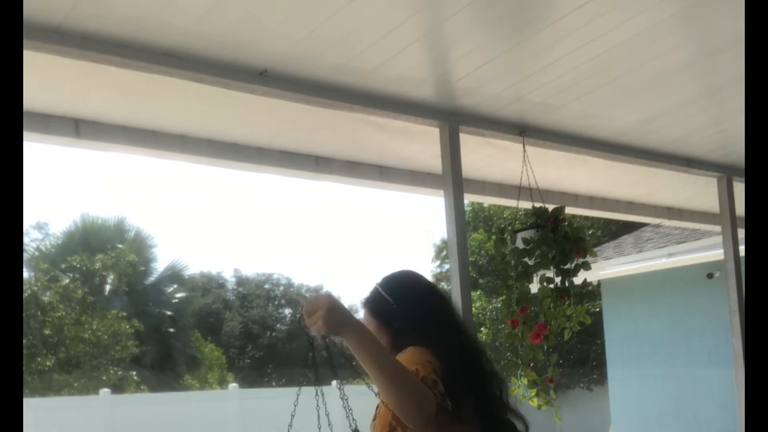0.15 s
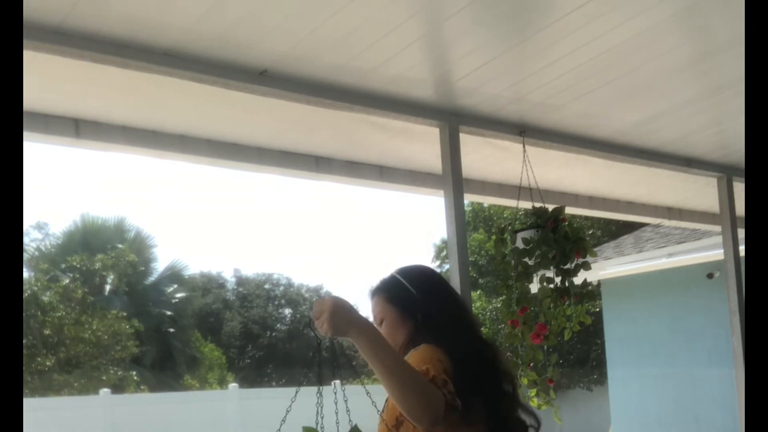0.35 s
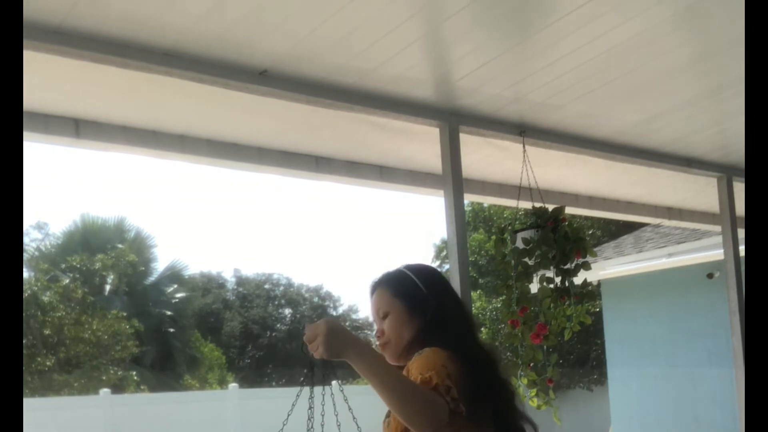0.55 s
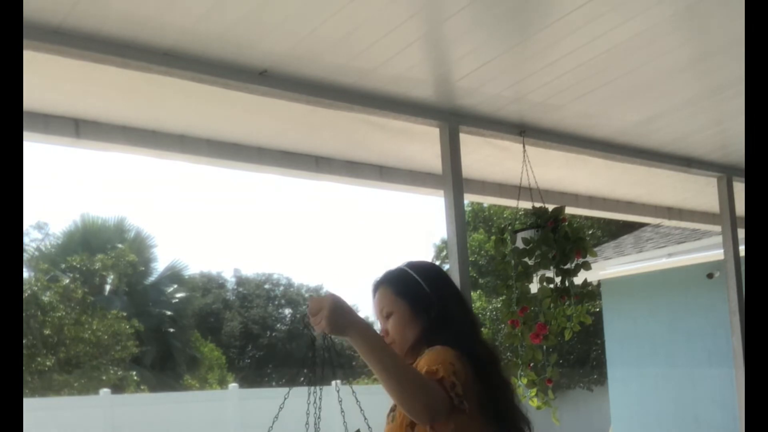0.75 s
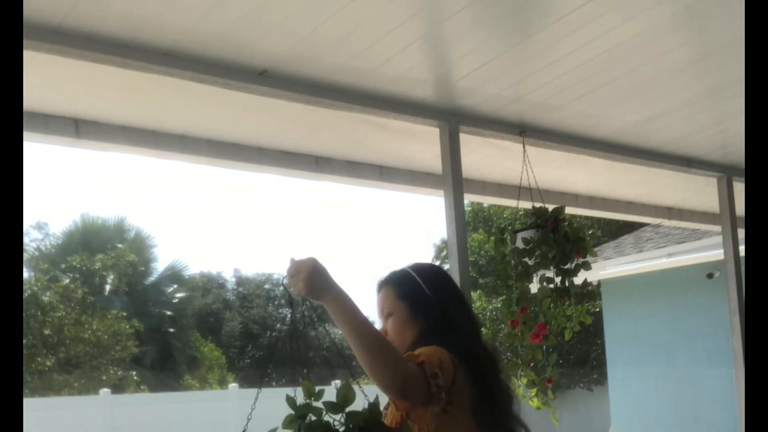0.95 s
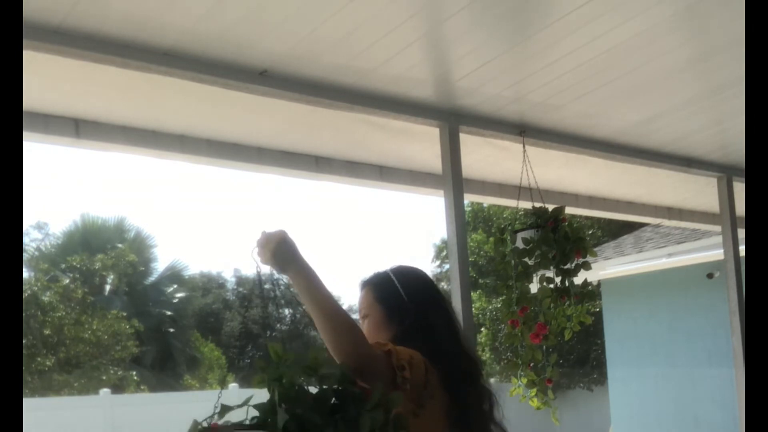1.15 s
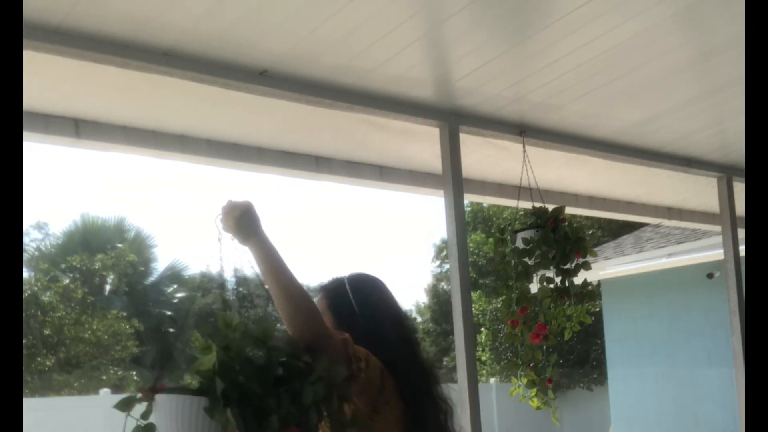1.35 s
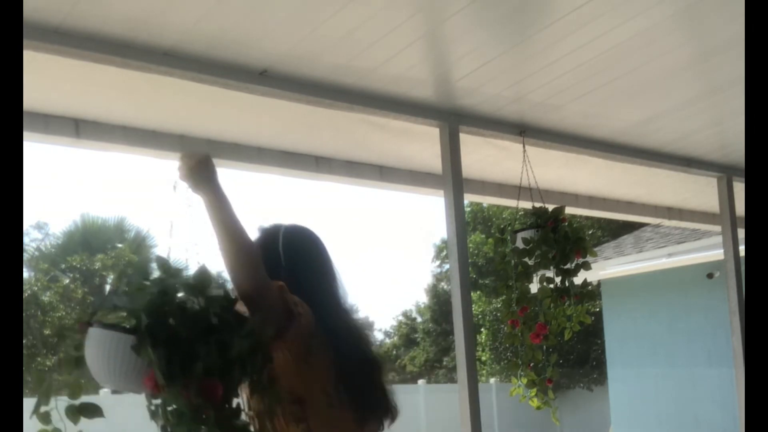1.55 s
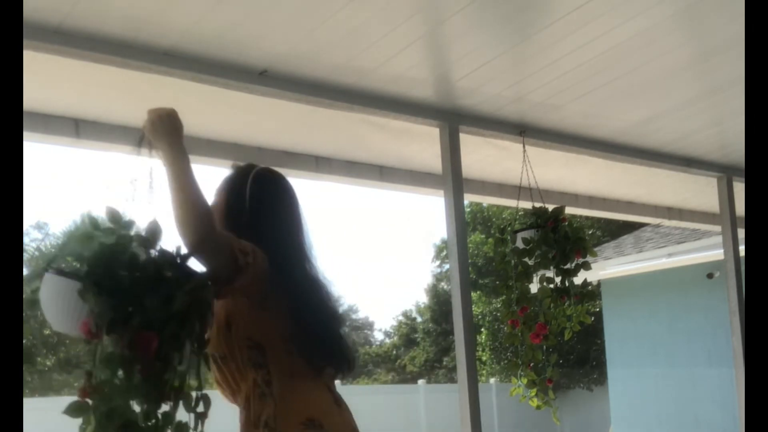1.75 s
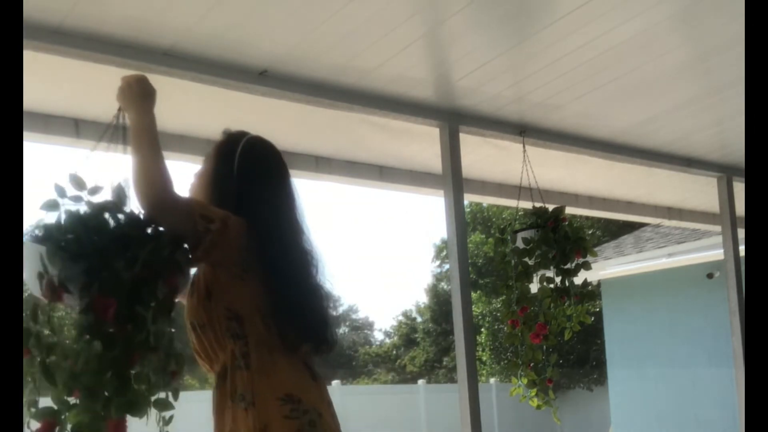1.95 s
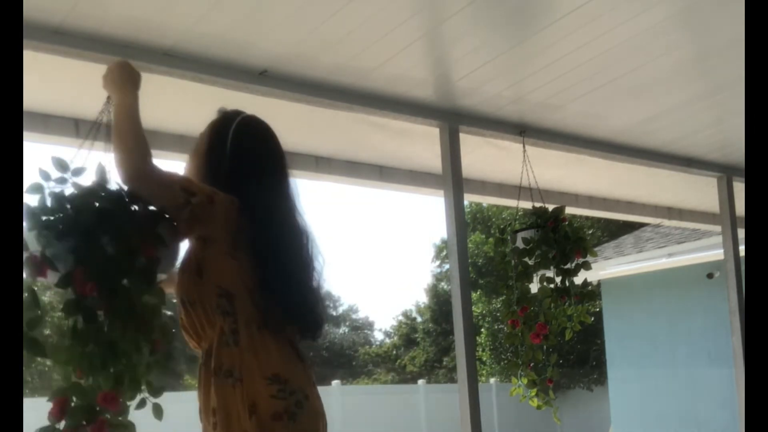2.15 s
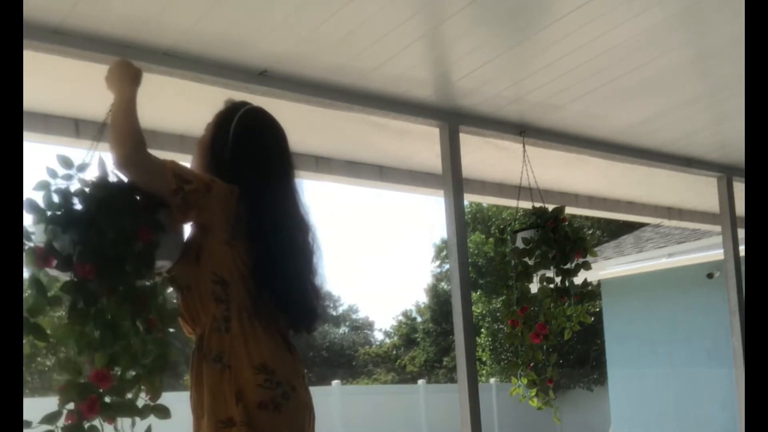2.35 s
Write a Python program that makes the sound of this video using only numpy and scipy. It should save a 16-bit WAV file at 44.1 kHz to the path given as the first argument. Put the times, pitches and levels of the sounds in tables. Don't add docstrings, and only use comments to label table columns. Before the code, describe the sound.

Hollow, woody knocks from a plant pot being lifted: a light touch, a loud tumbling thud, then weaker bounces. Low dragging runs beneath, with distant rumble and a faint early whine, on an echoing outdoor porch.

```python
import sys
import numpy as np
from scipy import signal
from scipy.fft import rfft, irfft
from scipy.io import wavfile

SR = 44100
rng = np.random.default_rng(int(sys.argv[2]) if len(sys.argv) > 2 else 0)


def pcm_store(signal):
    levels = np.round(np.clip(np.atleast_2d(signal), -1, 1) * 32767)
    wavfile.write(sys.argv[1], SR, levels.astype(np.int16).T)


def makeup_ratio(level_db):
    decades = np.asarray(level_db, float) / 20
    return 10 ** decades


N = 110250


def unit(x):
    return x / np.sqrt(np.mean(x ** 2) + 1e-20)


def in_time(rows):
    s, *columns = np.transpose(rows)
    return [np.interp(np.arange(N) / SR, s, c) for c in columns]


def at_hz(points, hz):
    table_hz, values = np.transpose(points)
    return np.interp(np.log(hz), np.log(table_hz), values)


def drift(rate_hz):
    r = np.exp(-80 * np.pi * rate_hz / SR)
    white = rng.standard_normal(N // 40 + 2002)
    slow = signal.lfilter([1], [1, -2 * r, r * r], white)[2000:]
    return np.interp(np.arange(N) / 40, np.arange(len(slow)), unit(slow))


def colour(x, spectrum):
    hz = np.linspace(1, SR / 2, 4097)
    octaves_below = np.maximum(np.log2(spectrum[0][0] / hz), 0)
    octaves_above = np.maximum(np.log2(hz / spectrum[-1][0]), 0)
    db = at_hz(spectrum, hz) - 18 * octaves_below - 18 * octaves_above
    cepstrum = irfft(db * np.log(10) / 20)
    cepstrum[1:4096] *= 2
    cepstrum[4097:] = 0
    return signal.fftconvolve(x, irfft(np.exp(rfft(cepstrum))))[:len(x)]


def bands():
    edges = 22 * 2 ** np.arange(0, 9.7, .5)
    white = rng.standard_normal((2, N))
    out = []
    for k, (low, high) in enumerate(zip(edges, edges[1:])):
        sos = signal.butter(2, [low, high], "band", fs=SR, output="sos")
        out.append((np.sqrt(low * high), signal.sosfilt(sos, white[k % 2])))
    return out


def knocks():
    # start_s, level_db, contact_ms, crack_db (re blow), low_modes_db
    contacts = [(1.099, -22.5, 1.34, -42, -7.5), (1.116, -13, 0.68, -26, 6.5), (1.455, -4, 2.83, -41, 8),
                (1.49, -22.5, 1.4, -12, -4), (1.495, -2, 3.2, -31.5, -2.5), (1.512, -4, 1.5, -8.5, -19),
                (1.519, 4.5, 1.23, -15.5, 10), (1.531, 0.5, 1.85, -16.5, 5), (1.546, 3.5, 2.1, -18, -34),
                (1.553, 6.5, 1.48, -15, 6), (1.582, 5.5, 2.04, -24.5, -26), (1.905, -15.5, 3.6, -40, 4.5),
                (2.178, -12.5, 0.62, -45, -1.5), (2.197, -19.5, 3.2, -1, -10), (2.198, -1, 0.56, -37, 4.5),
                (2.206, -1, 0.99, -26.5, 4.5), (2.217, -13.5, 1.63, -13.5, 18.5)]
    # pitch_hz, level_db, t60_s
    modes = [(184.6, -4, 0.088), (225.3, -21.5, 0.25), (275.7, -3, 0.058), (315.5, -9, .14),
             (348, -6, 0.097), (541.5, -4, 0.046), (617.3, 2.5, 0.036), (712, -1.5, 0.045),
             (753, -0.5, 0.021), (840, -12.5, 0.037), (948, -9.5, 0.036), (1177, -10, 0.031),
             (1510, -22.5, 0.061), (2400, -26, .04)]
    # pitch_hz, level_db (per Hz)
    crack_colour = [(800, -0.5), (1300, -10.5), (2000, -14.5), (2500, -16), (3200, -19.5), (5000, -29),
                    (8000, -45), (14000, -66)]
    body_gain_db, strike_spread_db, body_rise_s = -5.5, 4.5, .002
    crack_gain_db, crack_rise_s, crack_decay_s = 5, 0.0013, .005
    porch_db, body_low_hz = -3.0, 152.4

    strengths = rng.standard_normal((len(contacts), len(modes)))
    t = np.arange(SR // 4) / SR
    grit = rng.standard_normal((len(contacts), SR // 20))
    u = t[:SR // 20]
    crack_shape = np.exp(-u / crack_decay_s) * (1 - np.exp(-u / crack_rise_s))
    out, walls = np.zeros(N + 2 * SR), bands()
    for k, (start_s, level_db, contact_ms, crack_db, low_db) in enumerate(contacts):
        ring = 0
        for m, (hz, mode_db, t60_s) in enumerate(modes):
            strike_db = mode_db + strike_spread_db * strengths[k][m] + low_db * (m < 2)
            ring = ring + (-1) ** m * makeup_ratio(strike_db - 60 * t / t60_s) * np.sin(2 * np.pi * hz * t)
        ring = ring * (1 - np.exp(-t / body_rise_s))
        push = np.sin(np.pi * np.clip(t[:400] * 1000 / max(contact_ms, .1), 0, 1)) ** 2
        hit = makeup_ratio(level_db + body_gain_db) * signal.fftconvolve(ring, push / push.sum())[:len(t)]
        crack = unit(colour(grit[k], crack_colour)) * crack_shape
        hit[:len(u)] += makeup_ratio(level_db + crack_db + crack_gain_db) * crack
        wet = makeup_ratio(porch_db) * signal.fftconvolve(hit, porch(walls, k * 4000))
        i = int(start_s * SR)
        out[i:i + len(hit)] += hit
        out[i:i + len(wet)] += wet
    return signal.sosfilt(signal.butter(6, body_low_hz, "high", fs=SR, output="sos"), out[:N])


def porch(walls, start):
    # pitch_hz, t60_s
    decay = [(100, 0.23), (300, 0.53), (700, 0.46), (2000, 0.63), (5000, 0.64), (12000, 0.4)]
    build_s, early_db, early_s = 0.004, 1.5, 0.029
    t = np.arange(SR * 3 // 4) / SR
    tail = sum(makeup_ratio(-60 * t / at_hz(decay, hz)) * band[start:start + len(t)] for hz, band in walls)
    tail = tail * (1 - np.exp(-t / build_s)) * (1 + makeup_ratio(early_db) * np.exp(-t / early_s))
    return tail / np.sqrt(np.sum(tail ** 2))


def drag():
    # time_s, level_db
    effort = [(0, -48), (.5, -55.5), (.53, -35.5), (.62, -42), (.72, -39.5), (.9, -42), (1.0, -38),
              (1.1, -33.5), (1.25, -34), (1.38, -42.5), (1.44, -28), (1.8, -34), (1.92, -35), (2.0, -39.5),
              (2.1, -41.5), (2.17, -41), (2.4, -38.5), (2.5, -46.5)]
    # pitch_hz, level_db (per Hz)
    drag_colour = [(18, -62), (30, -13.5), (65, 3.5), (270, -1), (340, -4.5), (420, -4.5), (926, -19),
                   (1040, -30.5), (3000, -37), (3900, -72), (6600, -120)]
    slips_per_s, size_spread_db = 2200, 0.68
    sizes = makeup_ratio(size_spread_db * np.minimum(rng.exponential(1, N), 4)) * rng.choice([-1, 1], N)
    clumps = makeup_ratio(1.57 * drift(11))
    slips = sizes * (rng.random(N) < slips_per_s / SR) * clumps
    return makeup_ratio(in_time(effort)[0]) * unit(colour(slips, drag_colour))


def whine():
    # time_s, pitch_hz, level_db, octave_db (re tone)
    path = [
        (0, 960, -77, 0),
        (.1, 980, -64, -4),
        (.3, 1002, -65.5, -2),
        (.47, 990, -67, -1),
        (.53, 960, -54, -17),
        (.6, 920, -53.5, -13),
        (.7, 905, -64, -18),
        (.78, 895, -87, -16),
    ]
    waver_db, waver_hz = 4.5, 9.0
    hz, db, octave_db = in_time(path)
    phase = 2 * np.pi * np.cumsum(hz + waver_hz * drift(24.5)) / SR
    tone = makeup_ratio(db + waver_db * drift(59)) * np.sin(phase)
    octave = makeup_ratio(db + octave_db + waver_db * drift(23)) * np.sin(2 * phase)
    sounding = np.arange(N) < path[-1][0] * SR
    return sounding * np.sqrt(2) * (tone + octave)


def insects():
    # pitch_hz, width_hz, level_db, start_s, end_s
    songs = [(4200, 80, -70, 1.99, 2.18), (4520, 160, -69, 1.97, 2.3), (4900, 70, -68, 1.98, 2.7),
             (4700, 400, -74, 1.3, 2.0), (8950, 300, -75, .55, 1.9), (8600, 200, -73, 2.25, 2.7),
             (9150, 450, -71, 1.99, 2.22), (9300, 350, -70, 2.2, 2.7), (9750, 120, -72, 2.33, 2.7)]
    swell_s = .07
    out, t = 0, np.arange(N) / SR
    for hz, width_hz, db, start_s, end_s in songs:
        r = np.exp(-np.pi * width_hz / SR)
        resonance = [1, -2 * r * np.cos(2 * np.pi * hz / SR), r * r]
        song = signal.lfilter([1, 0, -1], resonance, rng.standard_normal(N))
        swell = np.clip(np.minimum(t - start_s, end_s - t) / swell_s, 0, 1)
        out = out + makeup_ratio(db + 1.6 * drift(8.1)) * unit(song) * swell
    return out


def air():
    # pitch_hz, level_db (per Hz)
    outdoor = [(15, -52), (25, -15), (64, -3), (270, -5.5), (439, -21.5), (1020, -23), (1260, -28),
               (2000, -29.5), (16000, -45)]
    # time_s, level_db
    hiss_level = [(0, -89), (.5, -92), (.53, -72), (1.4, -69), (2.5, -61.5)]
    rumble_db, hiss_low_hz = -43, 7000
    rumble = 0
    for hz, band in bands():
        patchy_db = np.clip(600 / hz, .5, 2) * drift(8)
        rumble = rumble + makeup_ratio(at_hz(outdoor, hz) + patchy_db) * band
    high_pass = signal.butter(2, hiss_low_hz, "high", fs=SR, output="sos")
    hiss = signal.sosfilt(high_pass, rng.standard_normal(N))
    return makeup_ratio(rumble_db) * unit(rumble) + makeup_ratio(in_time(hiss_level)[0]) * hiss


def scene():
    return (knocks() + drag() + air() + whine() + insects())[None]


def low_pass(x):
    return signal.sosfilt(signal.butter(12, 16410, fs=SR, output="sos"), x)


def record(dry):
    top_cut = signal.ellip(12, .2, 60, 15700, fs=SR, output="sos")
    mix = np.clip(signal.sosfilt(top_cut, dry), -1.0, 1.0)
    return low_pass(mix)


dry = scene()
out = record(dry)
pcm_store(out)
```